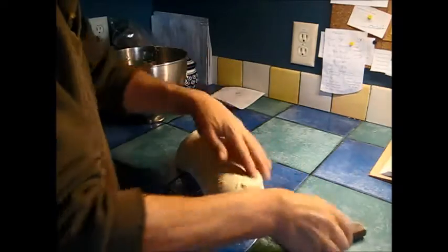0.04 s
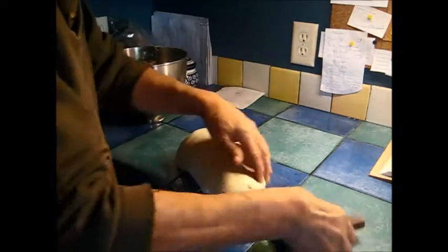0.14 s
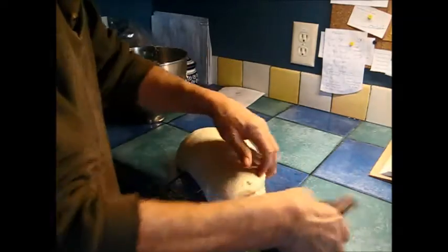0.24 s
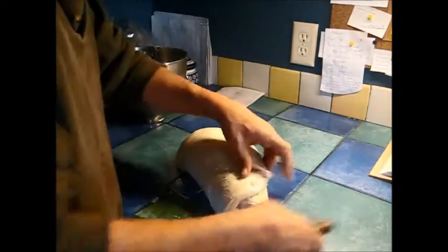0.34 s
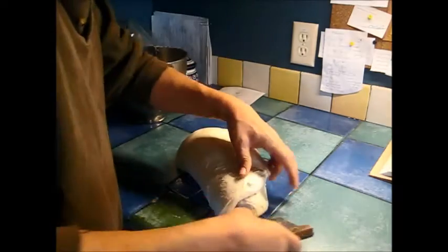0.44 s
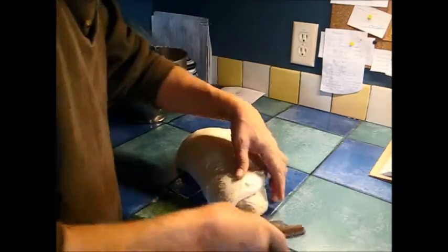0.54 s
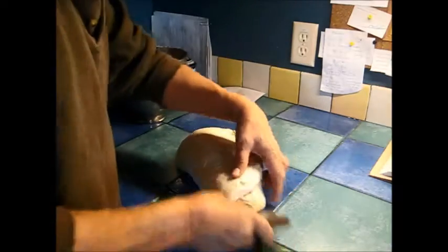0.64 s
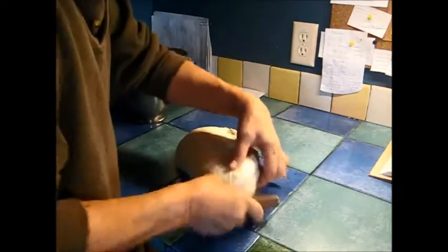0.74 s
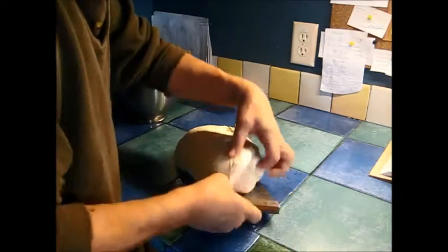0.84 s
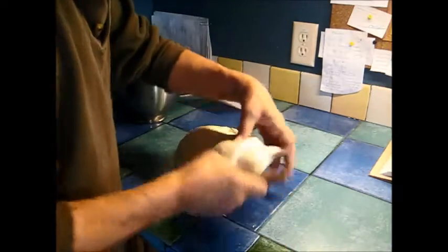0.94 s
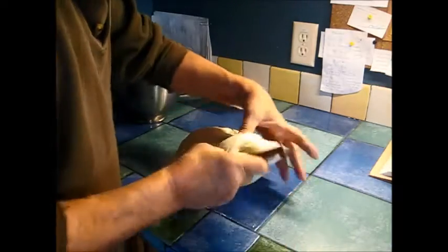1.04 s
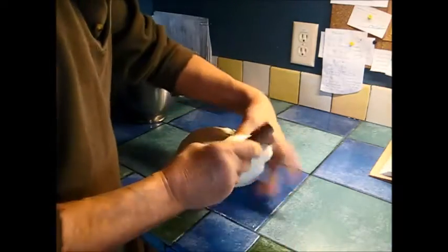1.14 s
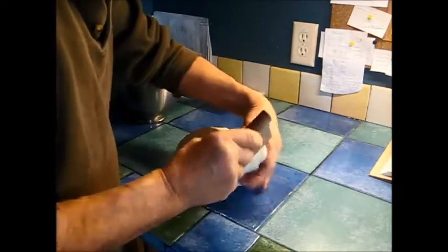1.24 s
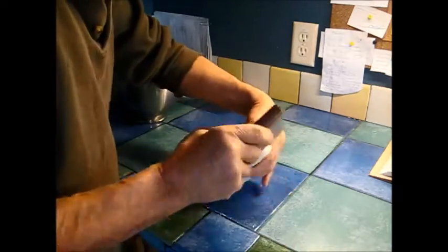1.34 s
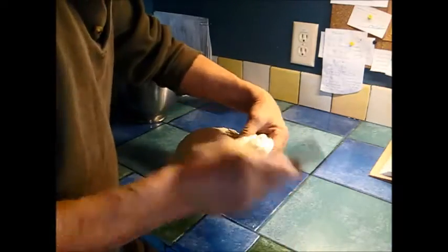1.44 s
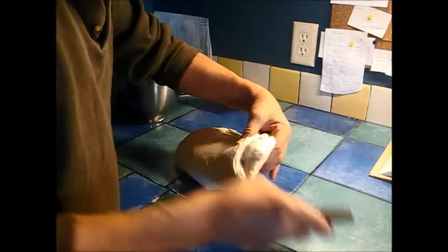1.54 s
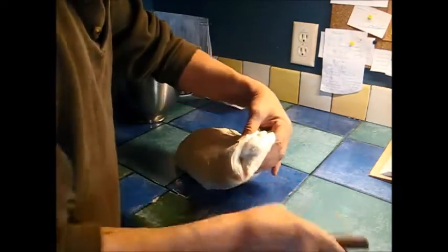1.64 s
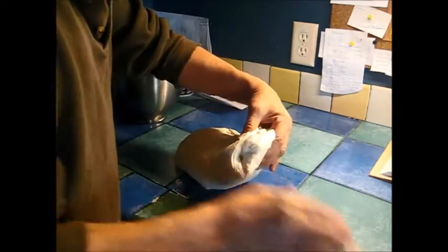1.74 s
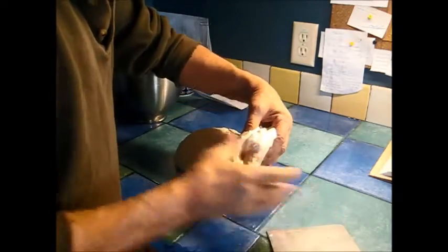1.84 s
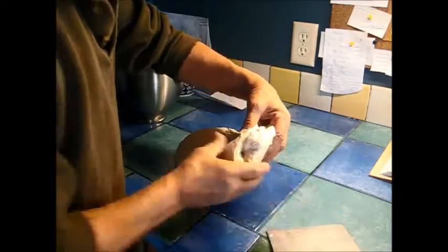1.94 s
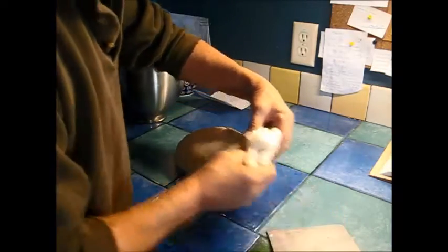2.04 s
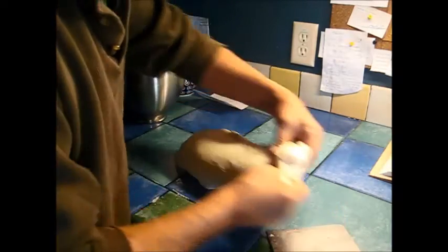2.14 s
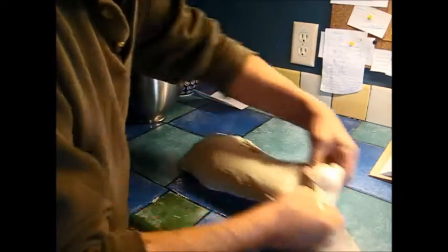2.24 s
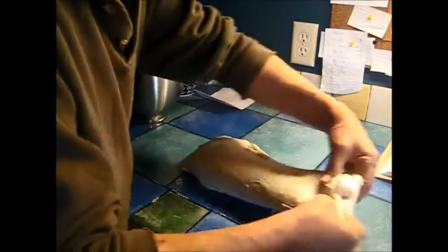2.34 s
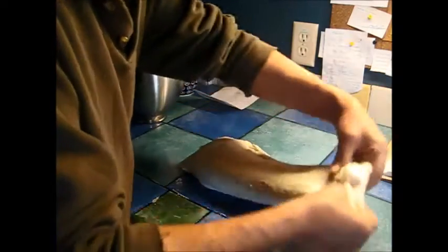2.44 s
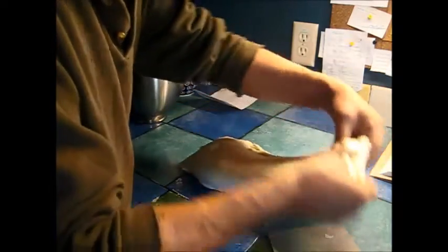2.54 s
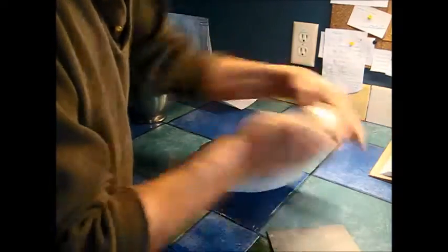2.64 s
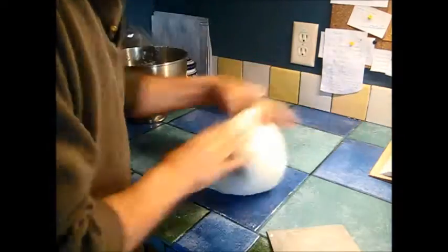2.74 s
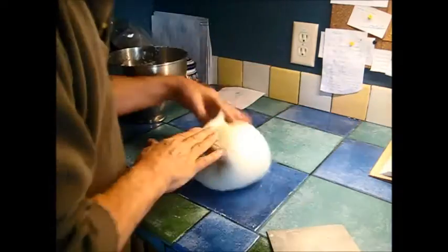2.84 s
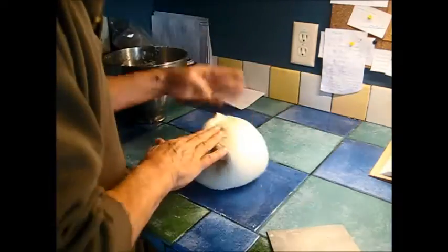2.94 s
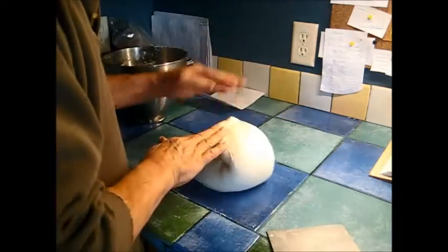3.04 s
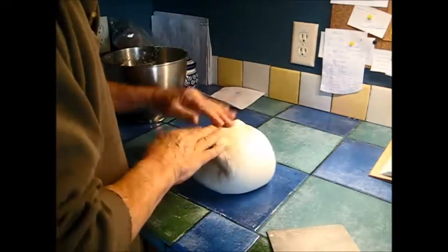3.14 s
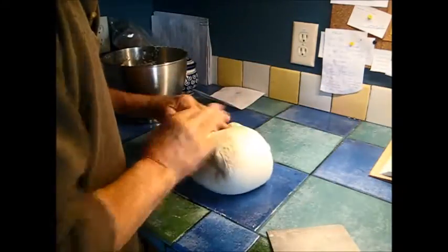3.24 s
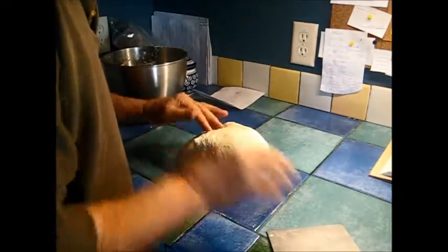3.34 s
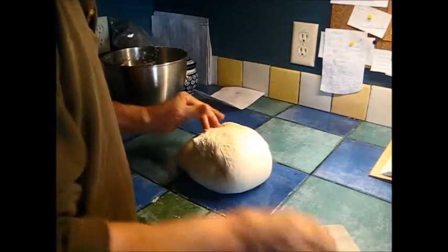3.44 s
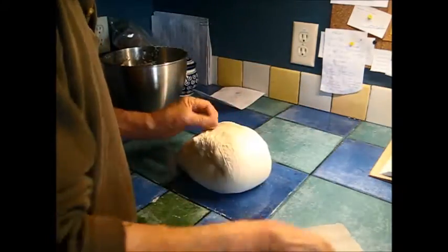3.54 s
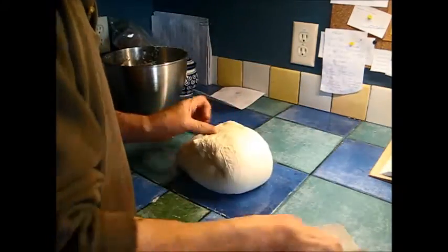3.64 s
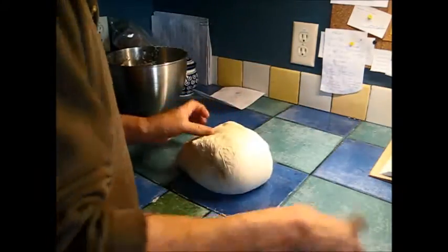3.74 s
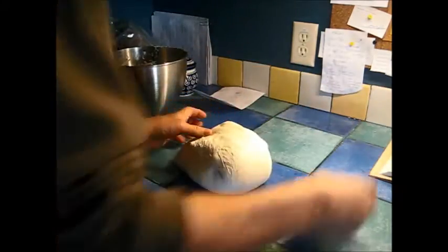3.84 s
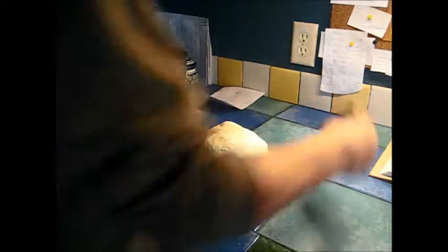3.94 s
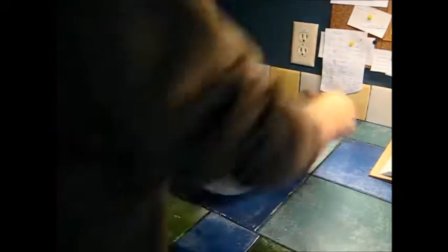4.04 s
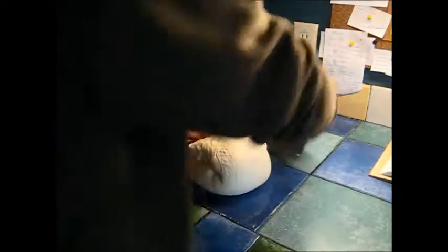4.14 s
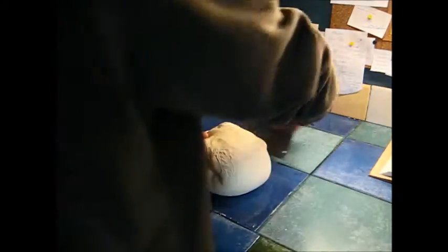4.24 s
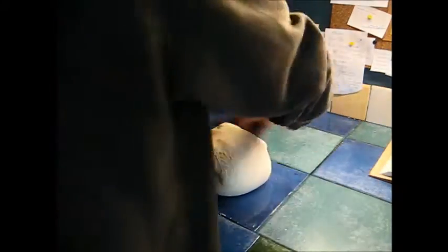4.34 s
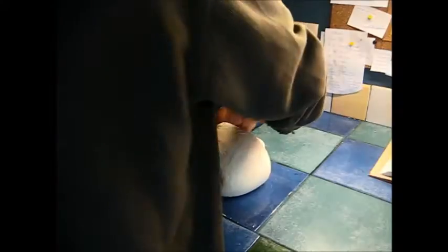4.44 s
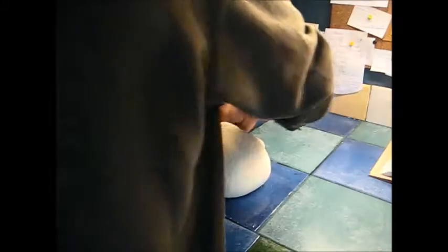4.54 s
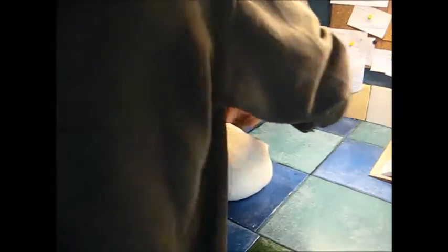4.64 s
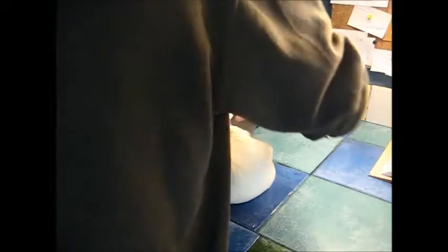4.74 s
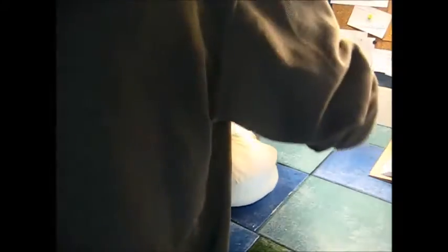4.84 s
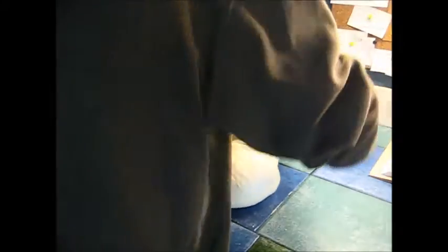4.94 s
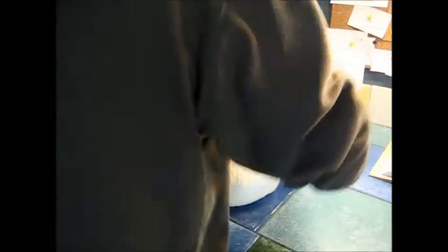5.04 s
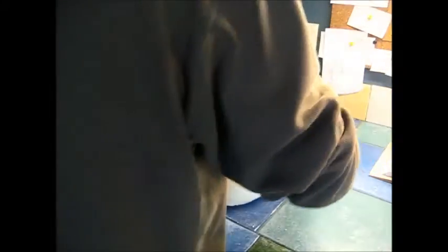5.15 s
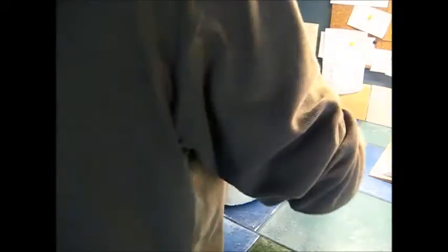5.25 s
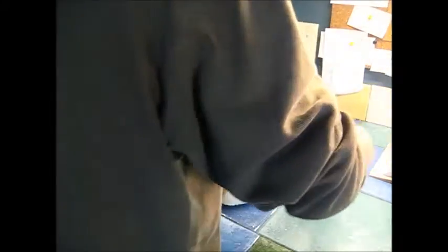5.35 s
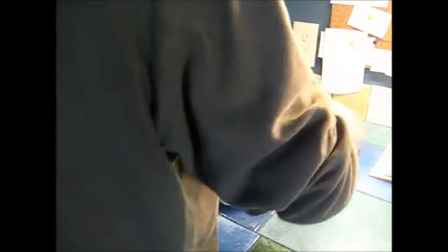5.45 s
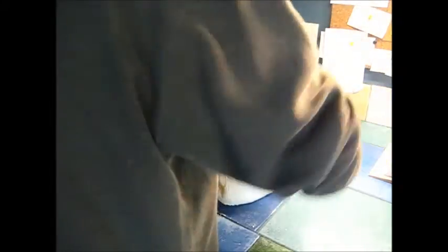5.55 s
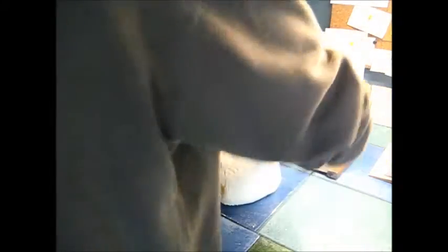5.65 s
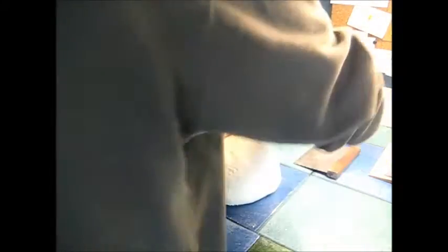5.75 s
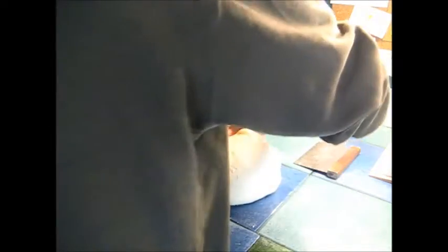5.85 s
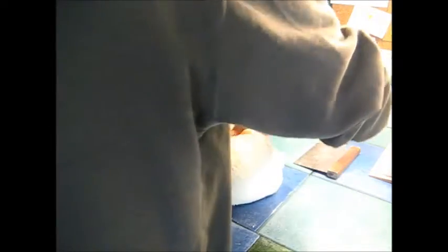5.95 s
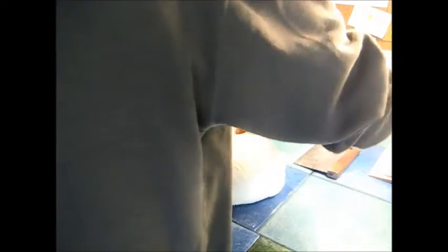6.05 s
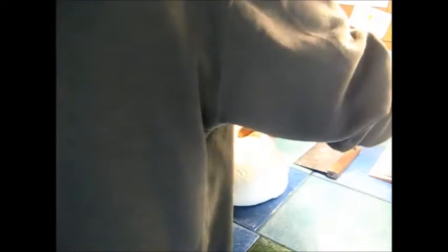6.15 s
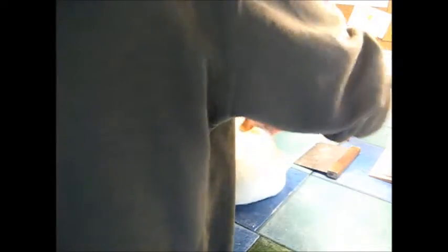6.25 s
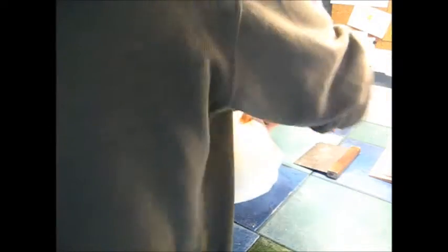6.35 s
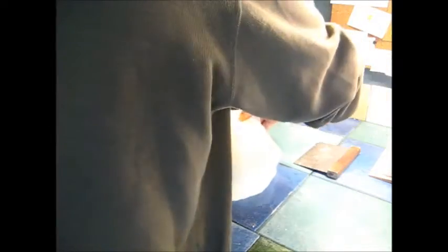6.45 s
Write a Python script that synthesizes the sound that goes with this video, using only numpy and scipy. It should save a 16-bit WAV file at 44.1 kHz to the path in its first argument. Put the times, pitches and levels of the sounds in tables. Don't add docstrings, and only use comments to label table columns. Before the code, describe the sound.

Close up in a small kitchen, a steel scraper with a wooden grip rasps and ticks rapidly over tile, then drops flat. Soft dough handling follows, then a second, distorted slam with rattling slide. Wet double smacks land as dough is folded, the blade scoops under it, soft pats follow, and a last slam and long slide give way to faint kneading. A cheap camera microphone hisses with a thin whine.

```python
import sys
import numpy as np
from scipy import signal
from scipy.fft import rfft, irfft
from scipy.io import wavfile
from scipy.ndimage import uniform_filter1d

SR = 44100
rng = np.random.default_rng(int(sys.argv[2]) if len(sys.argv) > 2 else 0)


def unload_audio(sound):
    columns = np.transpose(np.atleast_2d(sound))
    steps = np.round(np.clip(columns, -1, 1) * 32767)
    wavfile.write(sys.argv[1], SR, steps.astype(np.int16))


def invert_db(x):
    u = np.asarray(x, float) / 20
    return 10 ** u


N = 287207

# pitch_hz, width_hz, level_db
BLADE = [(1260, 17.5, -3.5), (1876, 156, 8.5), (2776, 93, 6), (3100, 50, 9), (3959, 110, 9.5),
         (5713, 84, 2.5), (7470, 80, -5.5)]
# pitch_hz, width_hz, level_db
HELD = [(1442, 224, 8), (2033, 340, 12), (3065, 80, 21.5), (3467, 570, 11.5), (4136, 64, 16.5),
        (5360, 237, -14.5), (5780, 141.4, -8), (7700, 112, -27.5)]
# pitch_hz, width_hz, level_db
SCOOP = [(1140, 95, 7), (1500, 230, 0.5), (2454, 216, -3), (2900, 54, -7), (3995, 130, -1), (5340, 160, -5),
         (6650, 98, -13.5), (8300, 120, -12)]
# start_s, end_s, modes, air_gap_strength (ratio), edge_hiss_db, counter_rumble_db
GRIPS = [
    (0, .13, HELD, 0.86, -5, -1),
    (.55, .63, HELD, 2.16, -8, -20.5),
    (1.6, 1.715, HELD, 1.8, -9, -23.5),
    (1.715, 2.2, BLADE, 1, -14, -7),
    (3.6, 4, HELD, 0.53, 3.5, -12.5),
    (4.2, 4.6, SCOOP, 1, 3, -13),
    (5.37, 5.8, BLADE, 0.47, -12, -7.5),
    (0, 6.6, HELD, 0.77, -2.5, -13.5),
]


def grip(s):
    return next(row[2:] for row in GRIPS if row[0] <= s + .01 < row[1])


def scraper(s, drive, low_hz, blade_hz, low_width, blade_width, ring, blow):
    modes, open_gap = grip(s)[:2]
    steel = evened(sum(invert_db(db) * resonate(drive, hz, width) / np.sqrt(width) for hz, width, db in modes))
    gap = evened(resonate(resonate(drive, low_hz, low_width), low_hz, 3 * low_width))
    low = max(open_gap, blow) * gap
    low = low + 0.72 * band(drive, 864, 2556, order=3)
    low = low + ring * band(steel, 1103, 1718)
    mid = .55 * evened(resonate(drive, blade_hz, blade_width))
    mid = mid + .75 * band(drive, 2300, 5800)
    mid = mid + 1.25 * ring * band(steel, 2300, 8500)
    edge = band(drive, 3470, 14000)
    return evened(low), -evened(mid), edge


# pitch_hz, level_db (per Hz)
GRIT = [(200, -76), (450, -16), (1000, 6), (2000, 0.5), (4000, -4), (6000, -7), (10000, -11), (15000, -13)]
# time_s, air_gap_hz, loudest_blade_hz
LEAN = [(0.03, 1685, 3850), (0.16, 1543, 4070), (0.24, 1315, 3300), (0.43, 1456, 3300), (0.575, 1294, 3270),
        (0.611, 1843, 3200), (0.69, 2045, 3200), (1.65, 1289, 3300), (1.71, 1230, 3100),
        (1.735, 1660, 3280), (1.9, 1657, 2850), (3.73, 1895, 4230), (3.85, 1500, 3670), (4.25, 1150, 3770),
        (4.335, 1118, 2600), (4.37, 1425, 3240), (5.3, 1330, 3100), (5.39, 1680, 3390)]
# peak_s, rise_s,
# fall_s, gap_db, blade_db (above the gap)
STROKES = [(0.032, 0.33, 0.0566, -31, 6), (0.119, 0.0452, 0.064, -42.5, 3.5), (0.172, .006, 0.023, -32, 6.5),
           (0.186, .025, 0.0335, -26, 2), (.238, 0.0111, 0.0913, -26, -5), (0.299, 0.0582, 0.14, -42, 3),
           (.368, 0.0213, 0.0155, -26, -8), (.40, 0.0624, 0.13, -31.5, -2), (.462, 0.0289, 0.109, -34, -3),
           (0.558, .006, 0.045, -30, -5), (0.582, .012, 0.0366, -23.5, -2.5), (.604, 0.0299, 0.0386, -22, 8),
           (.645, .03, 0.0397, -29, 12.5), (.675, .03, 0.0515, -23.5, 5.5), (.71, 0.02975, 0.133, -28, -1),
           (1.654, .006, 0.0244, -20.5, -6.5), (1.695, 0.035, 0.067, -30.5, -9.5),
          (1.738, .01, 0.0078, -27, -4), (1.77, 0.046, 0.048, -33, 2), (1.816, .04, 0.074, -27.5, 0),
          (1.86, 0.0359, 0.11, -27.5, 0), (1.919, 0.0981, 0.152, -27, -0.5),
          (3.733, 0.01025, 0.055, -39, 5), (3.765, 0.0379, 0.0943, -40.5, 6),
          (4.24, .016, 0.093, -34, 10.5), (4.298, 0.05, 0.063, -21.5, -1), (4.33, .05, 0.0935, -29.5, 9.5),
          (4.38, .06, 0.1312, -31, 3), (5.254, 0.00485, 0.126, -44, 5.5), (5.34, 0.043, 0.049, -44, -12.5),
          (5.384, 0.01122, 0.046, -26, 10.5), (5.408, .016, 0.094, -28, 8),
          (5.465, 0.0465, 0.135, -25.5, 1.5), (5.52, 0.0789, 0.151, -25, 0)]
STROKE_ROUND = 1.158
SLIDING_RING = 0.541
EDGE_PER_BLADE, EDGE_DULLING, BLADE_DULLING = 0.703, 0.53, 0.0515
RUMBLE_PER_BLADE, RUMBLE_LAG = -0.58, 0.088


def drag(s, rise_s, fall_s, db, blade_db):
    t = np.arange(max(s - 1.5 * rise_s, 0), s + 1.5 * fall_s + .005, 1 / SR)
    when, low_hz, blade_hz = np.transpose(LEAN)
    speed_db = gesture(t, s, rise_s, fall_s, STROKE_ROUND)
    edge_db, rumble_db = grip(s)[2:]
    drive = coloured(grains(len(t), 11000, 3.3), GRIT)
    low_hz, blade_hz = np.interp(t, when, low_hz), np.interp(t, when, blade_hz)
    low, mid, edge = scraper(s, drive, low_hz, blade_hz, 170, 400, SLIDING_RING, 0)
    rumble = band(grains(len(t), 9000, 2.42), 415.3, 1107)
    mid = invert_db(blade_db + BLADE_DULLING * speed_db) * mid
    edge = invert_db(edge_db + EDGE_PER_BLADE * blade_db + EDGE_DULLING * speed_db) * edge
    rumble = invert_db(rumble_db + RUMBLE_PER_BLADE * blade_db - RUMBLE_LAG * speed_db) * rumble
    stroke = invert_db(db + speed_db) * (low + mid + edge + rumble)
    return t[0], stroke * signal.windows.tukey(len(t), .1)


# start_s, blow_db, tile_ring_hz, blade_db (above the tile), blade_hz
TAPS = [(0.2215, -9.5, 2106, 4, 4250), (0.3514, -11.5, 1500, 9.5, 4260), (0.3745, -19, 1440, 13.5, 4370),
        (0.4381, -14.5, 1387, 4.5, 3410), (0.4505, -17, 1370, 2, 3256), (1.6495, -21.5, 1260, 0, 3090),
        (1.727, -4, 1637, 1.5, 4560), (1.7797, -19, 1566, 6, 3720), (1.7994, -16, 1740, 10, 2884),
        (4.2265, -18, 1006, 13.5, 3947), (5.3902, -4.5, 2073, 1.5, 3244)]
# start_s, blow_db, tile_ring_hz, blade_db (above the tile), blade_hz
BUMPS = [
    (0.1446, -26, 1330, 1, 4300),
    (0.225, -9.5, 2013, 0.5, 4204),
    (1.6725, -14, 1102, -1.5, 2560),
    (1.8465, -23.5, 1730, 11, 2910),
    (4.2976, -20, 1018, -3, 3880),
    (4.3364, -23, 1500, 10, 2700),
    (5.327, -28.5, 1077, -22.5, 2860),
]
# start_s, blow_db, tile_ring_hz, blade_db (above the tile), blade_hz
SLAMS = [
    (0.6937, -9, 1990, 10, 3100),
    (1.719, 10, 1839, -4, 3750),
    (5.3731, 6, 1711, -7, 3951),
]
TAP_T60_S, BUMP_T60_S, SLAM_T60_S = 0.0295, 0.068, 0.0118


def knock(s, db, low_hz, blade_db, blade_hz, t60):
    t = np.arange(3600) / SR
    drive = rng.standard_normal(len(t)) * invert_db(-60 * (t / max(t60, .004)) ** 1.012)
    drive[:4] += 3.23 * np.array([0.082, 0.67, 0.94, 0.333])
    low, mid, edge = scraper(s + .002, drive, low_hz, blade_hz, 212, 160, 0.238, 0.52)
    top = np.abs(low).max()
    return s - .0003, invert_db(db) / top * (low + invert_db(blade_db) * (mid + invert_db(-13.5) * edge))


# start_s, level_db, pitch_hz
THUMPS = [
    (0.549, -48, 60),
    (0.687, -36, 120),
    (1.89, -44, 70),
    (3.505, -35.5, 220),
    (3.583, -48, 80),
    (4.463, -51, 50),
    (4.81, -40.5, 71.3),
    (5.3755, -19, 205),
]


def thump(s, db, hz):
    u = np.arange(3000) / SR * 2 * np.pi * hz
    return s, invert_db(db) * np.e * u * (1 - 0.033 * u) * np.exp(-u)


# start_s, length_s, level_db, pitch_hz, width_hz
RUBS = [
    (3.526, 0.0504, -44.5, 5590, 700),
    (3.827, 0.091, -46.5, 4860, 1100),
    (3.847, 0.0624, -49.5, 3020, 400),
    (4.526, 0.112, -52, 3100, 150),
    (5.256, 0.0262, -44.5, 5340, 500),
    (6.242, .07, -50.5, 5200, 900),
]


def rub(s, length, db, hz, width):
    slips = grains(round(length * SR), 7800, 9.7)
    squeak = evened(resonate(resonate(slips, hz, width), hz, 2 * width))
    return s, invert_db(db) * squeak * signal.windows.tukey(len(slips), .6)


# start_s, smack_db, hollow_hz, skin_db
# (above the hollow), t60_s
PATS = [(1.016, -42.5, 388, 7.5, 0.107), (1.156, -44, 1310, 5, 0.06), (2.555, -45, 820.6, 4, 0.045),
        (2.755, -19.5, 1140, 3.5, 0.0563), (2.761, -21.5, 868, 8, 0.0366), (2.889, -44.5, 565, 5, 0.018),
        (3.188, -38.5, 250, -6.5, 0.065), (3.484, -19, 1605, -10.5, 0.124), (3.499, -19, 533, -19.5, 0.056),
        (4.224, -23, 545, -23, 0.0503), (4.624, -32.5, 630, -18.5, 0.05), (4.662, -36, 3016, -7, 0.055),
        (4.699, -40, 3950, -15, 0.05), (4.716, -34.5, 1890, -21.5, 0.039), (4.809, -41.5, 401, -1.5, 0.056),
        (4.929, -43.5, 2900, -0.5, 0.046), (5.006, -41.5, 905, 4.5, 0.052)]


def pat(s, db, hollow_hz, skin_db, t60):
    t = np.arange(4000) / SR
    drive = rng.standard_normal(len(t)) * invert_db(-60 * t / max(t60, .004))
    drive = drive * (1 - np.exp(-t / 0.000356))
    hollow = evened(resonate(drive, hollow_hz, 133)) + 0.66 * band(drive, 144, 1610)
    smack = evened(hollow) + invert_db(skin_db) * band(drive, 1200, 5710)
    return s - .001, invert_db(db) * smack / np.abs(evened(hollow)).max()


# pitch_hz, level_db (per Hz)
PEEL = [(710, -71.5), (1200, -10), (1650, -8), (2540, -4.5), (5610, -8.5), (6750, -14), (14000, -20.5)]
# peak_s, rise_s, fall_s, mass_db, peel_db
SQUEEZES = [(.95, 0.13, 0.0803, -50, -51), (1.3, 0.28, 0.41, -55.5, -52),
            (2.38, 0.463, 0.123, -47.5, -45.5), (2.62, 0.075, 0.034, -60.5, -47),
            (2.752, 0.1024, 0.19, -44, -36.5), (3.01, 0.11, 0.275, -50.5, -50),
            (3.193, 0.023, 0.014, -54.5, -46), (3.40, 0.356, 0.13, -50.5, -53.5),
            (3.515, 0.0153, 0.148, -37, -41.5), (3.7, 0.105, 0.19, -51, -48.5),
            (3.95, 0.035, 0.13, -62.5, -49), (4.11, 0.147, .1, -49.5, -58), (4.70, .2, 0.17, -48.5, -53),
            (4.9, 0.16, 0.23, -66, -57), (5.78, .1, 0.25, -58.5, -50.5), (5.88, 0.087, 0.063, -49.5, -59),
            (6.27, 0.076, 0.174, -55, -52.5)]
SQUEEZE_ROUND = 1.162
REST_MASS_DB, REST_PEEL_DB, POCKET_HZ = -62, -77.5, 3200


def handling():
    t = np.arange(N) / SR
    coarse = t[::32]
    mass_gain, peel_gain = invert_db(REST_MASS_DB), invert_db(REST_PEEL_DB)
    for s, rise_s, fall_s, mass_db, peel_db in SQUEEZES:
        effort = invert_db(np.maximum(gesture(coarse, s, rise_s, fall_s, SQUEEZE_ROUND), -99))
        mass_gain = np.hypot(mass_gain, invert_db(mass_db) * effort)
        peel_gain = np.hypot(peel_gain, invert_db(peel_db) * effort)
    mass = band(grains(N, 3000, 7.5), 102, 1568)
    peel = coloured(grains(N, 6000, 0.83), PEEL)
    peel = evened(peel + 0.149 * evened(resonate(peel, POCKET_HZ, 459)))
    return np.interp(t, coarse, mass_gain) * mass + np.interp(t, coarse, peel_gain) * peel


# pitch_hz, t60_s
KITCHEN = [(300, 0.21), (2000, 1), (10000, 0.35)]


def kitchen(x):
    taps = np.zeros(SR // 2)
    at = np.arange(150, len(taps) - 20, 20)
    taps[at + rng.integers(0, 20, len(at))] = rng.choice([-1., 1.], len(at))
    hz, t, z = signal.stft(taps, SR, nperseg=256)
    decay = invert_db(-60 * t / read(KITCHEN, hz)[:, None])
    tail = signal.istft(z * decay, SR, nperseg=256)[1]
    return signal.fftconvolve(x, tail / np.linalg.norm(tail))[:N]


# pitch_hz, level_db (per Hz)
HISS = [(12, -42), (20, -10), (142, -8.5), (228, 2), (301, -2), (718, -5), (849, -4), (1400, -9.5),
        (4300, -12), (7110, -16.5), (7730, -16), (8410, -18), (11800, -23.5), (14700, -18), (16000, -28.5)]
HISS_DB = -47.5
# pitch_hz, width_hz, level_db
HUMPS = [(10350, 670, -62.5), (14200, 800, -67.5)]
# pitch_hz, wander_hz, level_db
WHINE = [(7567, 14.96, -58), (15130, 24, -77)]


def camera():
    hiss = invert_db(HISS_DB) * coloured(rng.standard_normal(N), HISS)
    hiss += sum(invert_db(db) * evened(resonate(rng.standard_normal(N), hz, width)) for hz, width, db in HUMPS)
    swell = uniform_filter1d(uniform_filter1d(rng.standard_normal(N), size=2500), size=2500)
    lumps = invert_db(4.9 * np.tanh(evened(swell)))
    hiss += invert_db(-63) * lumps * band(rng.standard_normal(N), 38.9, 209)
    wander = evened(uniform_filter1d(rng.standard_normal(N), size=400))
    whine = sum(invert_db(db) * np.cos(2 * np.pi * np.cumsum(hz + dev * wander) / SR) for hz, dev, db in WHINE)
    return hiss + whine


def gesture(t, top_s, rise_s, fall_s, roundness):
    side_s = np.where(t < top_s, max(rise_s, .003), max(fall_s, .003))
    return -20 * (np.abs(t - top_s) / side_s) ** roundness


def grains(count, per_s, spread_db):
    drift = evened(uniform_filter1d(rng.standard_normal(count), size=300))
    clumps = invert_db(1.5 * np.clip(drift, -2, 2))
    size = invert_db(spread_db * np.minimum(rng.exponential(1, count), 3))
    sign = rng.choice([-1., 1.], count)
    return evened(clumps * size * sign * (rng.random(count) < per_s / SR))


def resonate(x, hz, width):
    turn = np.exp(2j * np.pi * np.cumsum(hz * np.ones(len(x))) / SR)
    r = np.exp(-np.pi * width / SR)
    return 2 * (turn * signal.lfilter([1 - r], [1, -r], x / turn + 1e-18)).real


def coloured(x, points):
    return evened(irfft(rfft(x) * invert_db(read(points, np.fft.rfftfreq(len(x), 1 / SR))), len(x)))


def band(x, lo_hz, hi_hz, order=2):
    sos = signal.butter(order, [lo_hz, hi_hz], "band", fs=SR, output="sos")
    return evened(signal.sosfilt(sos, x))


def evened(x):
    return x / np.sqrt(np.mean(x ** 2) + 1e-20)


def read(points, hz):
    f, value = np.transpose(points)
    return np.interp(np.log(hz + 1), np.log(f + 1), value)


def add(mix, s, sound):
    part = mix[max(round(s * SR), 0):][:len(sound)]
    part += sound[:len(part)]


def scene():
    near = handling()
    for table, t60 in ((TAPS, TAP_T60_S), (BUMPS, BUMP_T60_S), (SLAMS, SLAM_T60_S)):
        for row in table:
            add(near, *knock(*row, t60))
    for source, table in ((drag, STROKES), (thump, THUMPS), (rub, RUBS), (pat, PATS)):
        for row in table:
            add(near, *source(*row))
    echo = invert_db(-23) * kitchen(near)
    return (near + echo + camera())[None]


def band_limit(x):
    return signal.sosfilt(signal.butter(12, 16230, fs=SR, output="sos"), x)


def record(dry):
    clipped = np.clip(dry, -.94, .94)
    lowpass = signal.firwin(511, 15800, window=("kaiser", 8), fs=SR)
    limited = signal.oaconvolve(clipped, lowpass[None], "same")
    return band_limit(limited)


dry = scene()
out = record(dry)
unload_audio(out)
```